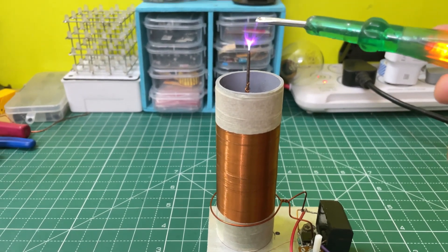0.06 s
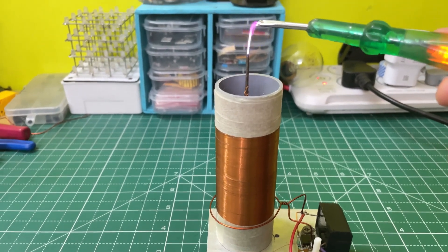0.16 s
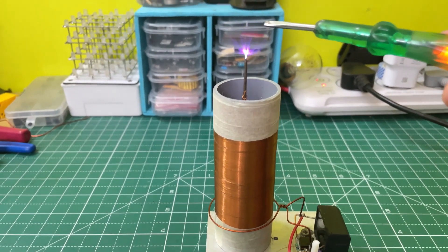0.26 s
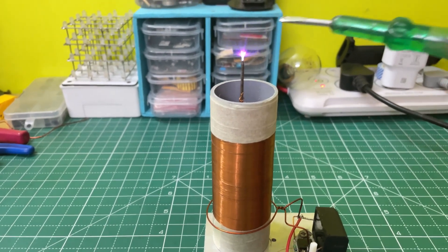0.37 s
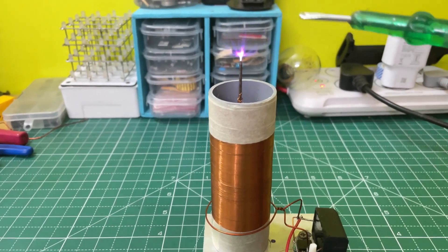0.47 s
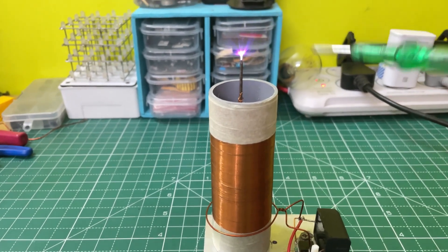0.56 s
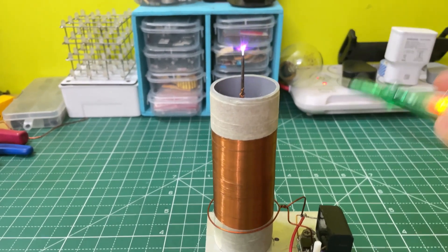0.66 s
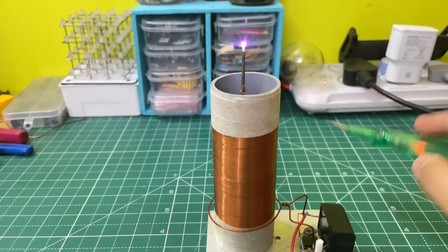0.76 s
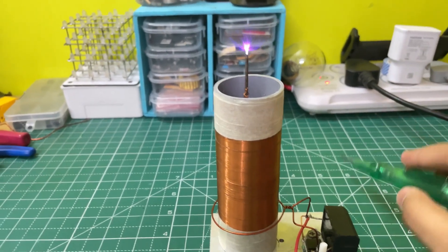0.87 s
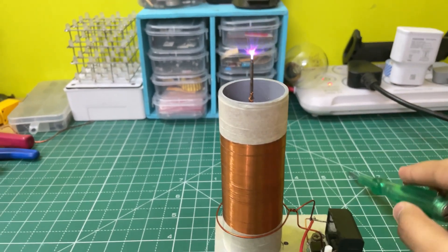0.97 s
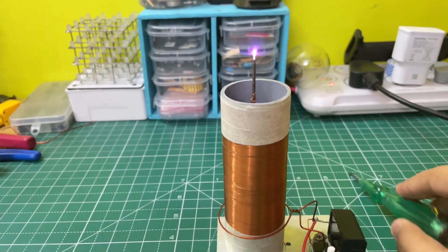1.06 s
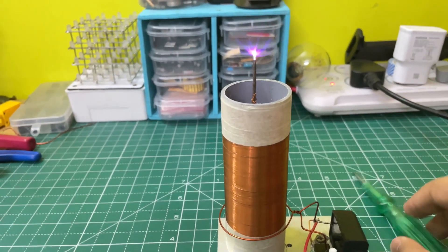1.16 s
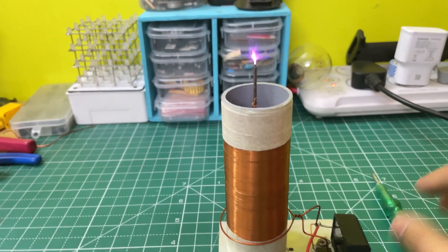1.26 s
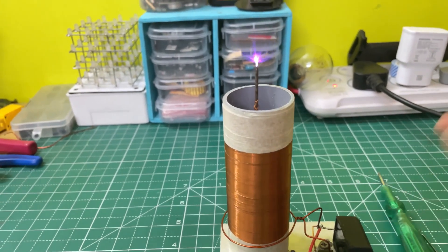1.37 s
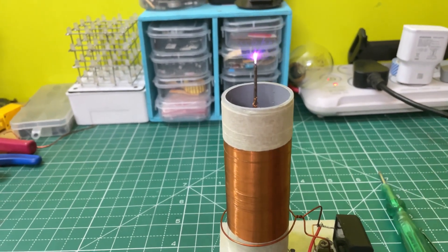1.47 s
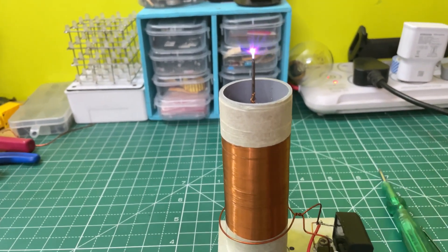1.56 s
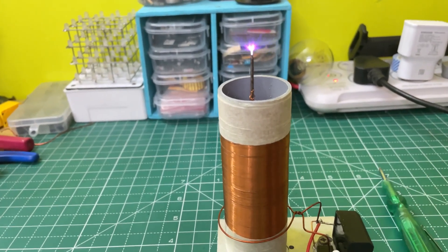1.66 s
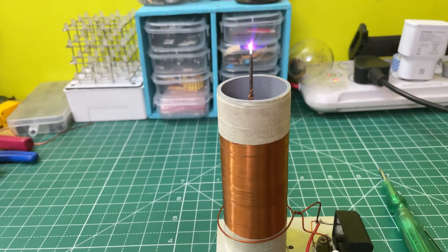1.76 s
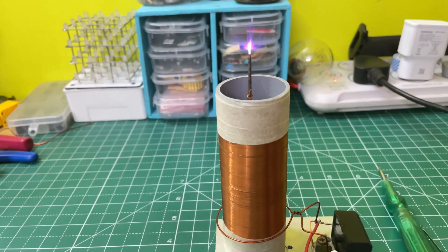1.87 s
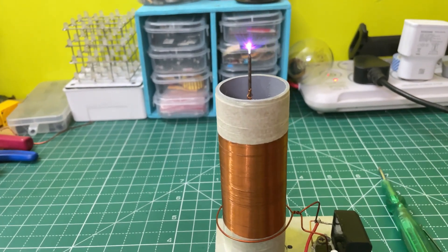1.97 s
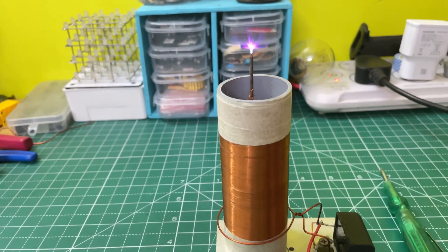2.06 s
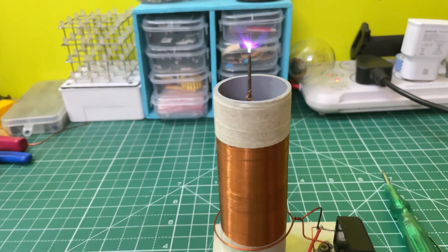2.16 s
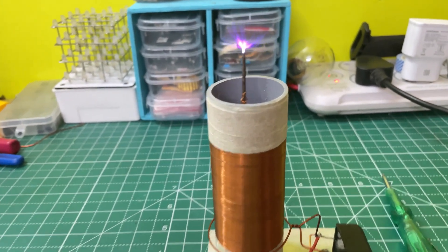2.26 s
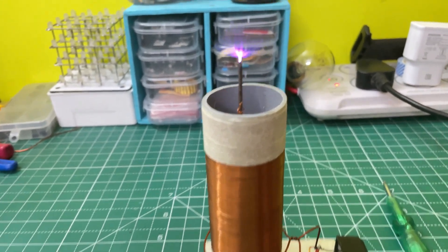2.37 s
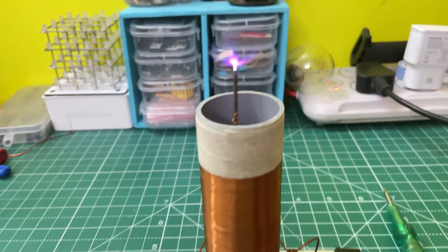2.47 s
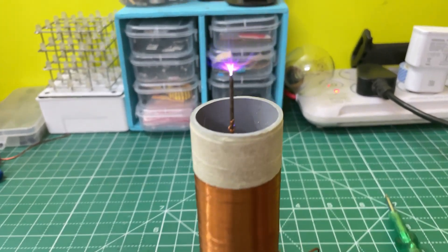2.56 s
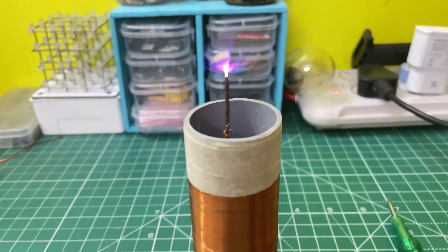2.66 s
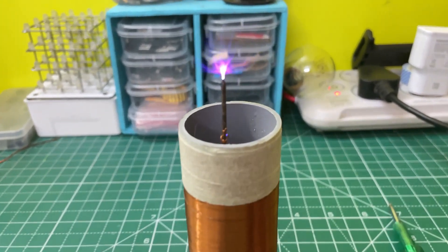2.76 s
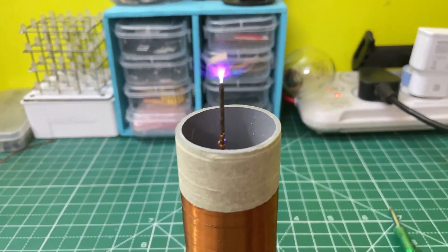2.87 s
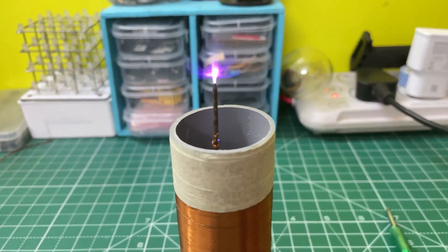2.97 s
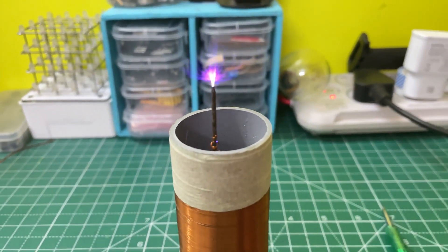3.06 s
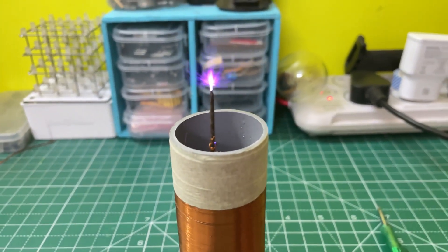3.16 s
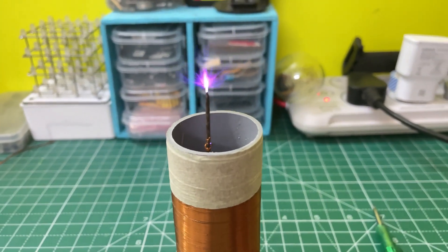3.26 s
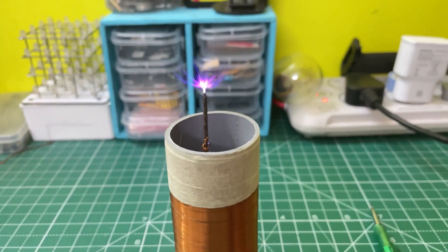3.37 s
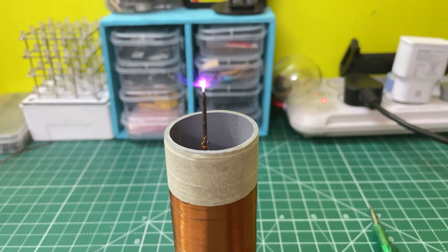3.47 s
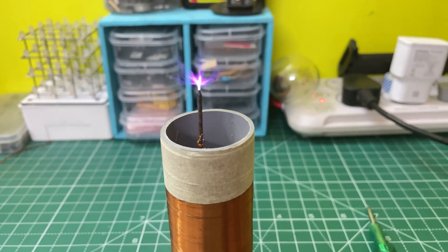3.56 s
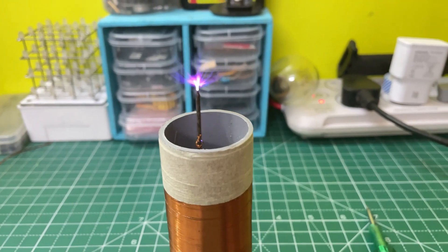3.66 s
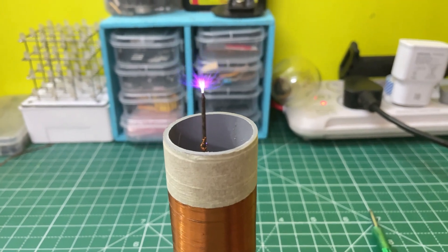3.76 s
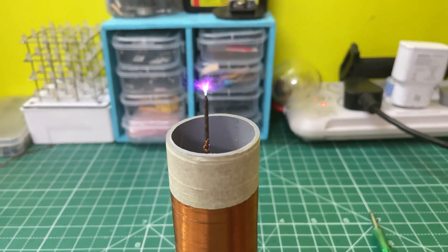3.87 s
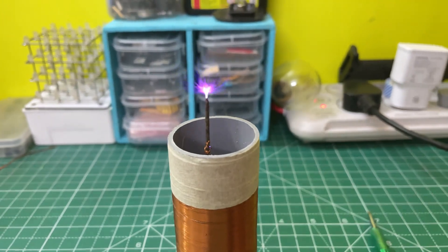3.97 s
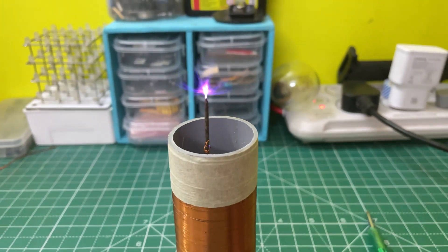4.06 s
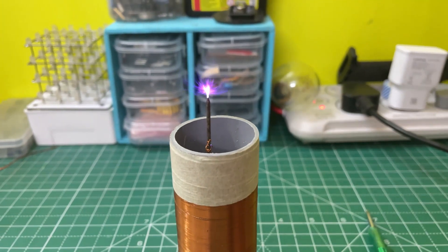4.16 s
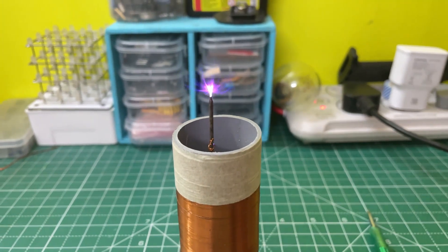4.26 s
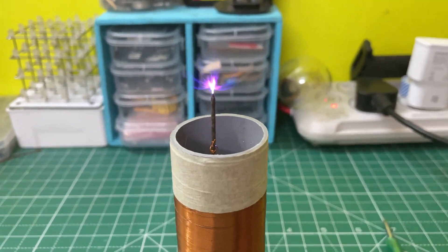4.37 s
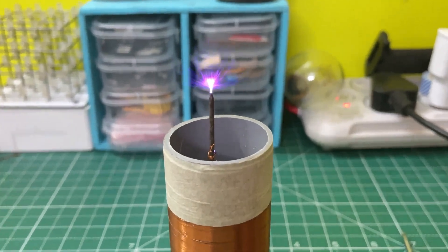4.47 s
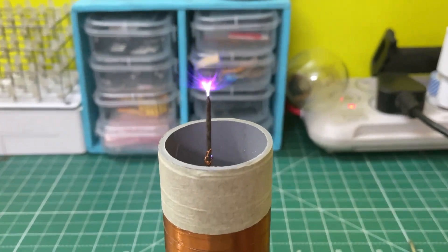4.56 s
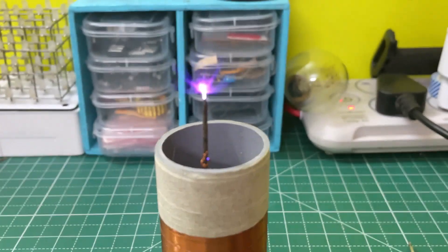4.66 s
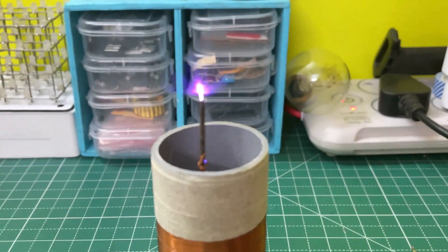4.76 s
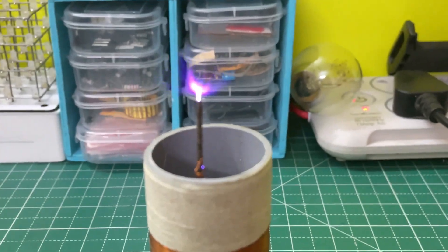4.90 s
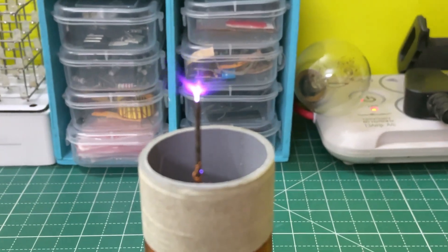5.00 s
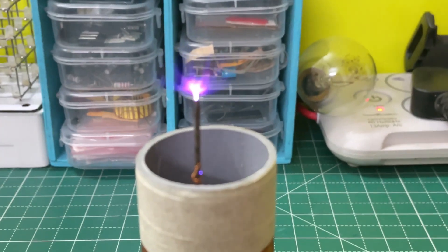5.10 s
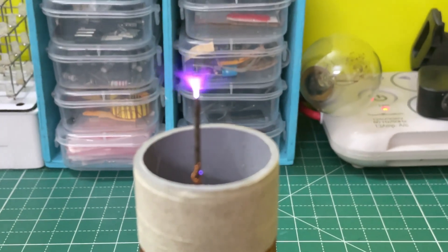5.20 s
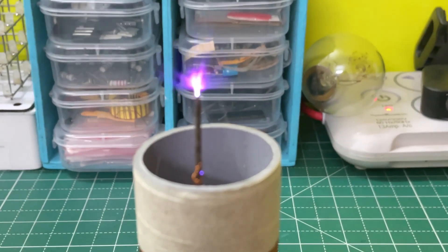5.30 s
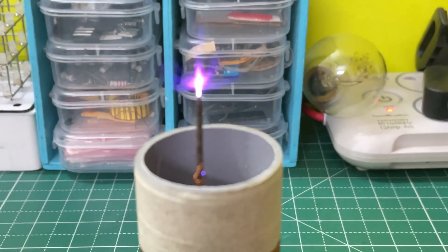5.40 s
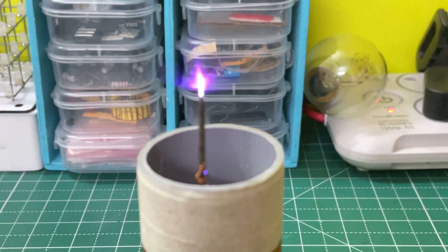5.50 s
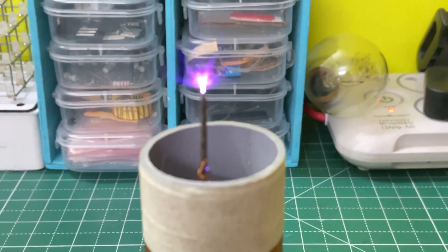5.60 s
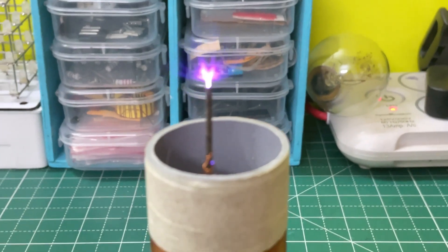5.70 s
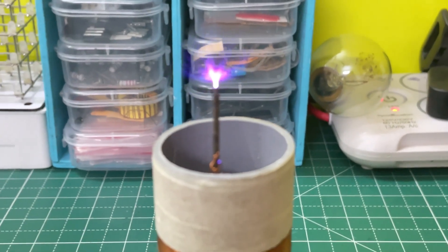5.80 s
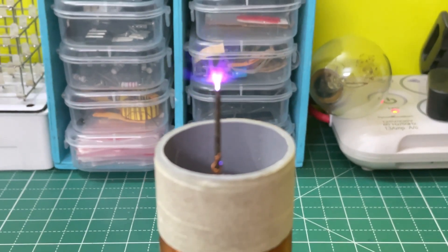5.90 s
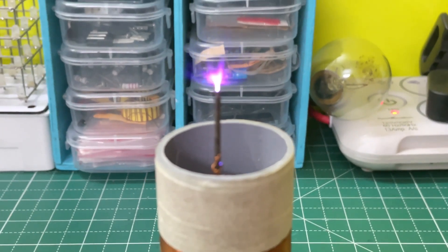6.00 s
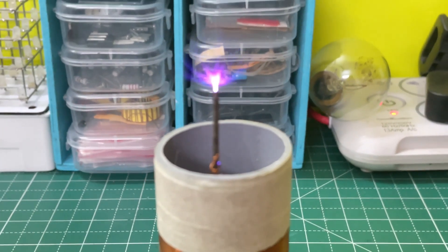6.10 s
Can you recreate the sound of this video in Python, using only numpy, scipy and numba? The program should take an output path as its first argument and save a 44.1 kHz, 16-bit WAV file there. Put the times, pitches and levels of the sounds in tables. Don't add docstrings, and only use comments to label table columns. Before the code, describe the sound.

A dense electric spark hisses from a tube-wound coil; a screwdriver clatters onto the desk mat, then a low motor hum swells from the right.

```python
import sys
import numpy as np
from scipy import signal
from scipy.fft import rfft, irfft
from scipy.io import wavfile
from scipy.ndimage import uniform_filter1d, map_coordinates
from numba import njit

SR = 44100
rng = np.random.default_rng(int(sys.argv[2]) if len(sys.argv) > 2 else 0)


def how_loud(loudness_db):
    steps = np.asarray(loudness_db, float) / 20
    return 10 ** steps


def int16_out(signal):
    q = np.round(np.clip(np.atleast_2d(signal).T, -1, 1) * 32767)
    wavfile.write(sys.argv[1], SR, q.astype(np.int16))


N = 270774
T = np.arange(N) / SR
F = np.fft.rfftfreq(N, 1 / SR) + 1e-3
EARS = np.array([[1], [-1]])


def unit(x):
    return x / np.sqrt(np.mean(x ** 2))


def noise(gain, channels=1):
    return unit(irfft(rfft(rng.standard_normal((channels, N))) * gain, N))


def colour(points):
    hz, db = np.transpose(points)
    return how_loud(np.interp(np.log(F), np.log(hz), db, left=-120, right=-120))


def walk(rate):
    hold = int(SR / rate)
    steps = np.repeat(rng.standard_normal(N // hold + 1), hold)
    return unit(uniform_filter1d(steps, hold)[:N])


def follow(table):
    return np.interp(T, *np.transpose(table))


def bumps(table):
    return sum(db * np.exp(-((T - s) / w) ** 2) for s, w, db in table)


MOVES = [
    (1.5, 1.57),
    (2.35, 2.5),
    (4.35, 5.1),
]
TURNS = [(1.5, 1.7), (2.25, 2.55), (4.38, 4.7)]


def by_pose(table, moves=MOVES):
    return [np.interp(T, np.ravel(moves), np.repeat(c, 2)[1:-1]) for c in np.transpose(table)]


@njit
def svf(x, hz, width):
    y, b, l = np.empty(len(x)), 0., 0.
    for i in range(len(x)):
        g, k = np.tan(np.pi * hz[i] / SR), width / hz[i]
        v = (b + g * (x[i] - l)) / (1 + g * (g + k))
        b, l, y[i] = 2 * v - b, l + 2 * g * v, k * v
    return y


def band(x, hz, width):
    return np.array([svf(ear, f, width) for ear, f in zip(x, hz)])


def ports(gain, lag, share, sign=1, wet=1):
    def shift(x, samples):
        return np.interp(np.arange(N) - samples, np.arange(-N, N), np.tile(x, 2))

    direct = noise(gain)[0]
    late = sign * map_coordinates(direct, [np.arange(N) - lag], order=3, mode="wrap")
    dull = irfft(rfft(direct) * wet, N)
    drift = 5.5 * walk(0.864)
    near = []
    for ear in rng.random((2, 5, 2)):
        near.append(unit(sum(shift(dull, 100 + 1500 * a + (b - .5) * drift) for a, b in ear)))
    far = noise(gain * wet, channels=2)
    walls = (.6 * np.array(near) + .8 * far) * np.std(dull)
    share = np.clip(share, 0, 1)
    return np.sqrt(share) * np.array([direct, late]) + np.sqrt(1 - share) * walls


def ring(modes, scatter_db, length=0.36, push=0.000084, bias=0, detune=0.023):
    t = np.arange(int(length * SR)) / SR
    hz, db, t60 = np.transpose(modes)[:, :, None]
    level, tuning, polarity = rng.standard_normal((3, len(modes), 1))
    swing = np.sign(polarity + bias) * np.sin(2 * np.pi * hz * (1 + detune * tuning) * t)
    x = (how_loud(db + scatter_db * level) * swing * 0.0025 ** (t / t60)).sum(axis=0)
    x = x * (1 - np.exp(-t / push))
    return x / np.abs(x).max()


def add(out, s, x, pan_db):
    i = int(s * SR)
    out[:, i:i + x.shape[-1]] += x * how_loud(EARS * pan_db / 2)


def cut_rumble(x):
    return signal.sosfilt(signal.butter(2, 75, "high", fs=SR, output="sos"), x)


# frequency in Hz, level in dB per Hz.
ROOM_RUMBLE = [(15, -34), (25, -12), (70, -2), (107, -0.5), (139, -2.5), (167, -1.5), (267, -1), (300, 0.5),
               (346, -4.5), (389, -2.5), (560, -6.5), (730, -41), (1230, -120)]
# time in seconds, half length in seconds, change in dB.
ROOM_STIRS = [(.3, 0.27, 1), (.75, 0.083, 2.5), (1.55, 0.69, 3.5), (1.85, 0.19, -5.5), (2.3, 0.087, 0),
              (3.55, 0.063, -0.5), (5.0, 0.19, -7.5), (5.5, 0.23, 3.5)]


def room():
    left, right, both = noise(colour(ROOM_RUMBLE), channels=3)
    settling_db = 2 / (1 + (T / 0.79) ** 4)
    level_db = -60 + settling_db + bumps(ROOM_STIRS) + 0.42 * walk(1.63)
    return (0.6 * both + 0.49 * np.array([left, right])) * how_loud(level_db)


# time in seconds, half length in seconds, rise in dB.
ARM_MOVES = [(.05, 0.14, 19), (.22, .08, 18), (.47, .08, 21.5), (.75, .07, 25), (1.05, .06, 14)]


def sleeve():
    rumble = noise(1 / (1 + ((F - 107) / 35) ** 4))
    return rumble * how_loud(-82.5 + bumps(ARM_MOVES) + .6 * EARS)


# time in seconds, half length in seconds, change in dB.
HUM_DIPS = [(4.55, 0.072, -1.5), (4.81, 0.089, -1.5), (5.26, .05, -4.5), (5.54, .06, -1)]


def hum():
    age = T - 3.955
    level_db = -49.5 + 0.9 * age + bumps(HUM_DIPS)
    pan_db = -9.5 + 2 * age
    phase = 2 * np.pi * 303 * T + 0.41 * walk(6.2) + 0.24 * EARS
    tone = np.sqrt(2) * (np.sin(phase) + how_loud(-34) * np.sin(2 * phase))
    return tone * np.clip(age / 0.37, 0, 1) * how_loud(level_db + EARS * pan_db / 2)


# time in seconds, half length in seconds, rise in dB.
TRACE_SWELLS = [(.2, 0.048, 7), (.86, 0.049, 13.5), (1.9, 0.026, 6), (2.19, 0.078, 6)]


def hum_trace():
    width = 7.4
    gain = 1 / (1 + ((F - 299.7) / width) ** 2) + 0.56 / (1 + ((F - 321.6) / width) ** 2)
    level_db = -64 - 1.5 * T + bumps(TRACE_SWELLS) - 3.9 * EARS
    return noise(gain) * how_loud(level_db) * np.clip((2.4 - T) / 0.14, 0, 1)


# start in seconds, frequency in Hz, level in dB, t60 and push in seconds.
FINGER_BUMPS = [
    (3.583, 1250, -36, 0.0042, 0.00023),
    (3.584, 710, -50, 0.073, 0.0018),
    (3.605, 55, -50, 0.12, 0.013),
]


def fingers():
    out = np.zeros((2, N))
    for s, hz, db, t60, push in FINGER_BUMPS:
        add(out, s, how_loud(db) * ring([(hz, 0, t60)], 0, push=push), -3.0)
    return cut_rumble(out)


# start in seconds, crack peak in dB, then desk, thud and boom
# in dB relative to it, and left minus right in dB.
KNOCKS = [(0.980, -33, -8, -3, -8, 4), (0.994, -42.5, -6, 2, -10, -8), (1.1634, -25.5, -6, -4, -5.5, 12),
          (1.169, -15, -5, -8.5, -13, 2), (1.1722, -30, 6, -15, -3, 7), (1.181, -39, -6, -11, -5, -8),
          (1.185, -44, 6, -9, 6, -9), (1.206, -51, 0, 0, 7, 0), (1.2133, -30.5, -1, -18, -7, 5),
          (1.2165, -29, -11, -4, -7, 5), (1.2515, -31.5, -4, -21, -9, 5), (1.261, -32.5, -2, -7, -20, -8),
          (1.2817, -35.5, -5, -2.5, -12, 7), (1.3027, -45.5, -7, 3.5, 6.5, -9), (1.318, -55, 4, 13, 9, 2),
          (1.353, -51, -12, -3, -3, 0), (1.3694, -44, -10, -7, -8, 0), (1.408, -53.5, 6.5, -4, 2, -2)]
# frequency in Hz, level in dB, t60 in seconds.
HANDLE = [(1250, -1.5, 0.0097), (1394, -6, 0.017), (1596, -0.5, 0.016), (1860, 1.5, 0.013),
          (2300, -3.5, 0.036), (2595, -1, 0.012), (2795, 0.5, 0.012), (2950, 2, 0.0095),
          (4480, -10, 0.0045), (6460, -9, 0.0071)]
TIP = [(6460, 4, 0.006), (10000, -8, 0.0037), (11400, 5, 0.0041), (12800, -4, 0.0025)]
DESK = [(426, -8, 0.077), (497, -4.5, 0.02), (522, 3, 0.029), (602, -6, 0.03), (655, -8, 0.029),
        (705, -2.5, 0.027), (763, 3, 0.02), (865, -2.5, 0.018), (985, -4, 0.021)]
THUD = [(195, -0.5, 0.13), (240, 4, 0.11), (297.5, -2, 0.12), (333.4, -3, 0.064)]
BOOM = [(62, -10, 0.3), (114.4, 0, 0.153), (145.5, -8, 0.11), (168, 2.5, 0.19)]


def screwdriver():
    out, low = np.zeros((2, N)), np.zeros((2, N))
    t = np.arange(SR // 2) / SR
    for s, db, desk_db, thud_db, boom_db, pan_db in KNOCKS:
        handle = 1.09 * ring(HANDLE, 4.9, push=0.00025)
        handle = handle + 0.5 * EARS * ring(HANDLE, 1.5, push=0.00024)
        rattle = rng.standard_normal(handle.shape) * np.exp(-t[:handle.shape[1]] / 0.0013)
        rattle = uniform_filter1d(rattle * how_loud(0.71 * (db + 27.0)), size=3)
        tip = how_loud(0.69 * (db + 17) - 4.5) * ring(TIP, 1.3)
        desk = how_loud(desk_db + 2.5) * ring(DESK, 1.5, detune=0.02, push=0.0009)
        add(out, s, how_loud(db) * (handle + tip + .5 * rattle + desk), np.clip(pan_db, -5, 5))
        thud = ring(THUD, 0.62, push=0.0023, bias=10, detune=0.013)
        add(low, s, how_loud(db + thud_db) * thud, .6)
        boom = ring(BOOM, 0.63, push=0.0065, bias=10, detune=0.009)
        uneven_boom = how_loud(-10) * EARS * ring(BOOM, 3)
        add(low, s, how_loud(db + boom_db) * (boom + uneven_boom), 1.2)
    echo = rng.standard_normal((3, len(t)))
    tail = signal.lfilter([.25], [1, -.75], echo[:2] * 1.1 + echo[2])
    tail = tail * 0.00084 ** (t / 0.38) * (t > .002)
    answer = how_loud(-39.0) * signal.fftconvolve(out, tail, axes=1)[:, :N]
    return cut_rumble(out + answer + low)


# start in seconds, peak in dB.
SNAPS = [(0.0277, -38), (0.1353, -40), (0.1402, -42), (0.1463, -39), (0.149, -43), (0.1643, -51),
         (0.1683, -46), (0.174, -39), (0.1813, -40), (0.2057, -57), (0.3002, -42), (1.4745, -42)]


def snaps():
    out, t = np.zeros((2, N)), np.arange(400) / SR
    for s, db in SNAPS:
        crack = uniform_filter1d(rng.standard_normal(len(t)), size=2) * np.exp(-t / .0004)
        ringing = ring([(2120, -2, 0.004), (6300, -10, 0.0088)], 0.87, len(t) / SR)
        add(out, s, how_loud(db) * (0.93 * crack + ringing), 1.5)
    return out


# time in seconds, frequency in Hz.
LOW_MODE = [(2.15, 626), (2.35, 611), (2.62, 649), (2.9, 652), (3.0, 605), (3.5, 622), (3.9, 656),
            (4.0, 615), (4.12, 640), (4.25, 621), (4.4, 638)]
# time in seconds, half length in seconds, rise in dB.
SINGS = [(2.25, 0.12, 12), (2.5, 0.11, 11), (2.8, 0.15, 5), (3.6, .1, 5), (3.88, 0.08, 7), (4.1, .08, 9.6),
         (4.32, 0.14, 14)]
# time in seconds, half length in seconds, rise in dB.
FLARES = [(2.25, 0.29, 6.5), (5.75, .2, 5)]
POSE_WHISTLE = [(-28, -27), (-11.5, -10.5), (-14, -19), (-12.5, -17)]


def whistles(mode_db):
    mode_hz = follow(LOW_MODE) + 2 * walk(3.3)
    breath = unit(svf(rng.standard_normal(N), mode_hz, 12.0))
    tone = np.sin(2 * np.pi * np.cumsum(mode_hz) / SR)
    out = how_loud(mode_db + bumps(SINGS)) * (.4 * breath + 1.27 * tone)
    second_db, fourth_db = by_pose(POSE_WHISTLE)
    for hz, width, db in ((1262, 31.0, second_db), (2540, 105.0, fourth_db + bumps(FLARES))):
        hz = hz * (1 + 0.013 * walk(4))
        narrow = svf(svf(rng.standard_normal(N), hz, width), hz, width)
        out = out + how_loud(db + 2 * walk(3.5)) * unit(narrow)
    return out


# frequency in Hz, width in Hz, level in dB.
PIPE_MODES = [(577, 2200, -9.5), (733, 25, -7), (1302, 210, -0.5), (1585, 164, -1.5), (2022, 290, 3.5),
              (2420, 320, -2), (3100, 1900, -6.5)]
# tube in dB, then upper modes, top pipe mode and sizzle in dB relative to it, air in dB.
POSE_TONE = [(-58, 1, -11, -2.5, -64.5), (-58, 2, -5.5, -4, -64.5), (-56.5, 0, -0.5, -2.5, -63.5),
             (-58, -2.5, -10.5, 0.5, -64.5)]
# right port lag in samples, left minus right of the tube and of the sizzle in dB.
POSE_AIM = [(4.1, 6, -1.5), (4.3, 3, 2), (8, 5.5, -2), (2.7, 3, -1.5)]
POSE_RIM = [(2.4, -.7), (2.4, -.7), (2.2, .7), (0, 0)]
POSE_DIRECT = [(.74, .45), (.74, .4), (.74, .55), (.9, 1)]
# second echo gap left and right in Hz, two shallow gaps in Hz,
# lowest pipe mode in dB relative to the tube.
POSE_GAPS = [(7500, 7300, 1610, 3160, -18), (7300, 7200, 1536, 2750, -23.5),
             (7400, 7520, 1874, 2420, -20.5), (7170, 7280, 1790, 2720, -16.5)]
POSE_DEPTHS = [(.4, 0.45, 0.74, 0.19), (.6, .8, 0.72, 0.19), (.6, .6, .6, .3), (.9, .6, 0.85, 0.05)]


def tube():
    upper_db, top_db = by_pose(POSE_TONE)[1:3]
    lag, rim_lag = by_pose(POSE_AIM, TURNS)[0], by_pose(POSE_RIM, TURNS)[0]
    share = by_pose(POSE_DIRECT)[0]
    power = how_loud(2 * -5.5)
    for hz, width, db in PIPE_MODES:
        power = power + how_loud(2 * db) / (1 + (2 * (F - hz) / width) ** 2) ** 1.37
    pipe = np.sqrt(power / (1 + (F / 3340) ** 24) / (1 + (480 / F) ** 6))
    rim = 1 / (1 + (2670 / F) ** 24)
    below, above = pipe * np.sqrt(1 - rim), pipe * np.sqrt(rim)
    mouth = ports(below, lag, share, wet=1 + .7 / (1 + (F / 1000) ** 6))
    rim_ratio = np.linalg.norm(above) / np.linalg.norm(below)
    out = 1.378 * (mouth + rim_ratio * ports(above, rim_lag, share))
    upper = 1 / (1 + (1710 / F) ** 8)
    out = out + (how_loud(upper_db + 0.5) - 1) * irfft(rfft(out) * upper, N)
    out = out + (how_loud(top_db) - 1) * band(out, np.full((2, N), 3150.), 830.0)
    *shallow_hz, mode_db = by_pose(POSE_GAPS)[2:]
    out = out + whistles(mode_db)
    wall_hz = np.full(N, 2270.)
    for hz, depth in zip([*shallow_hz, wall_hz], by_pose(POSE_DEPTHS)[:3]):
        hz = hz * (1 + .008 * walk(4))
        out = out - np.clip(depth, 0, .95) * band(out, [hz, hz], 175.0)
    return out - .5 * band(out, np.full((2, N), 930.), 158.0)


# frequency in Hz, level in dB per Hz.
SIZZLE = [(3000, 6), (3600, 1.5), (4300, 3), (5300, 3), (6500, 4), (7200, -16), (8000, -44)]
# first gap left and right in Hz, depth 0-1,
# sizzle crest left and right in Hz.
POSE_ECHO = [(4100, 4200, 0.36, 6600, 6750), (3870, 4050, 0.4, 6500, 5640), (3650, 3880, 0.61, 5750, 5350),
             (3500, 3940, 0.31, 4440, 4440)]


def sizzle():
    lag, share = by_pose(POSE_RIM, TURNS)[1], by_pose(POSE_DIRECT)[1]
    out = ports(colour(SIZZLE), lag, share)
    return unit(out + band(out, by_pose(POSE_ECHO)[3:], 340.0))


# frequency in Hz, level in dB per Hz.
AIR = [(6650, 1), (7500, 1), (8300, -3.5), (9000, -1), (10000, -1.5), (10800, -4.5), (11700, -8.5),
       (13000, -7), (13800, -2), (14500, -1), (15650, -0.5), (15850, -13)]
POSE_AIR = [(.7, .92), (.66, .9), (.66, .92), (.87, .98)]


def air():
    share, inverted_gain = by_pose(POSE_AIR, TURNS)
    wet = 0.37 + 0.77 / (1 + (F / 13000) ** 8)
    return ports(colour(AIR), -6.06, share, sign=-inverted_gain, wet=wet)


def desk_echo(hiss):
    def shake(hz):
        return np.array(hz) * (1 + .025 * walk(5.9))

    echo = by_pose(POSE_ECHO)
    gap_hz, top_gap_hz = shake(echo[:2]), shake(by_pose(POSE_GAPS)[:2])
    depth = echo[2] + 0.097 * walk(9.2)
    first_gap = np.clip(depth, 0, 1) * band(hiss, gap_hz, 700.)
    hiss = hiss - first_gap - .75 * band(hiss, top_gap_hz, 900.)
    hiss = hiss - np.clip(depth + .3 * walk(14), 0, .97) * band(hiss, gap_hz, 200.0)
    edge_hz = 3680 * (1 + 0.015 * walk(8))
    edge_depth = np.clip(depth + by_pose(POSE_DEPTHS)[3] + .25 * walk(12), 0, .97)
    for side in (.982, 1.018):
        hiss = hiss - edge_depth * band(hiss, [side * edge_hz] * 2, 144.0)
    return hiss


# time in seconds, level in dB.
SPRAY = [(0, -1.5), (.8, 0), (1.6, -0.5), (2.2, 0.6), (2.8, 1), (3.25, 0), (3.6, 1), (4.1, -0.9),
         (4.6, 0.3), (5.1, 1.3), (5.4, 0.5), (6.14, 1.5)]
# time in seconds, half length in seconds, change in dB.
CHOKES = [
    (.157, 0.0048, -9.5),
    (.168, .006, -3),
    (.178, 0.0027, 3),
    (0.19, 0.0046, -7),
]


def spark():
    tube_db, _, _, sizzle_db, air_db = by_pose(POSE_TONE)
    tube_pan, sizzle_pan = by_pose(POSE_AIM)[1:]
    body = tube() * how_loud(5.5 + .5 * walk(6.5) + EARS * tube_pan / 2)
    body = body + sizzle() * how_loud(sizzle_db + 4.0 + .5 * walk(15) + EARS * sizzle_pan / 2)
    hiss = body * how_loud(tube_db) + air() * how_loud(air_db + 10.5 + .5 * walk(9.4))
    flicker_db = .5 * walk(14) + 0.62 * walk(60) + 0.66 * walk(900)
    return desk_echo(hiss) * how_loud(flicker_db + bumps(CHOKES) + follow(SPRAY))


def scene():
    return room() + sleeve() + hum() + hum_trace() + fingers() + screwdriver() + snaps() + spark()


# time in seconds, half length in seconds, change in dB.
TOP_LOSSES = [
    (1.181, .008, -30),
    (1.195, .012, -25),
    (1.31, 0.05, -30),
]


def top_cut(x):
    return signal.sosfilt(signal.butter(12, 15880, fs=SR, output="sos"), x)


def record(dry):
    top = irfft(rfft(dry) / (1 + (13700 / F) ** 80), N)
    mix = dry + (how_loud(bumps(TOP_LOSSES)) - 1) * top
    mix = np.tanh(2.5 * mix) / 2.5
    mix = signal.sosfilt(signal.ellip(8, .2, 70, 15850, fs=SR, output="sos"), mix)
    return top_cut(mix)


dry = scene()
out = record(dry)
int16_out(out)
```